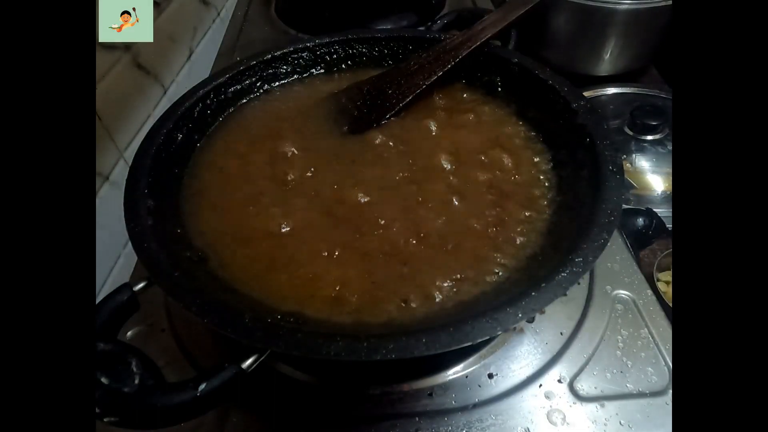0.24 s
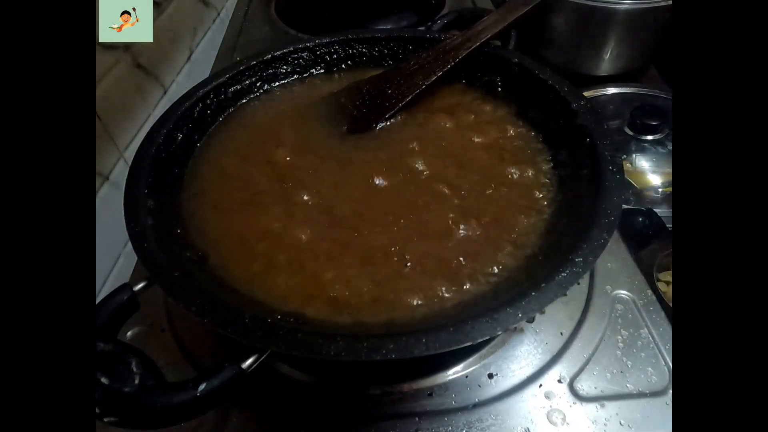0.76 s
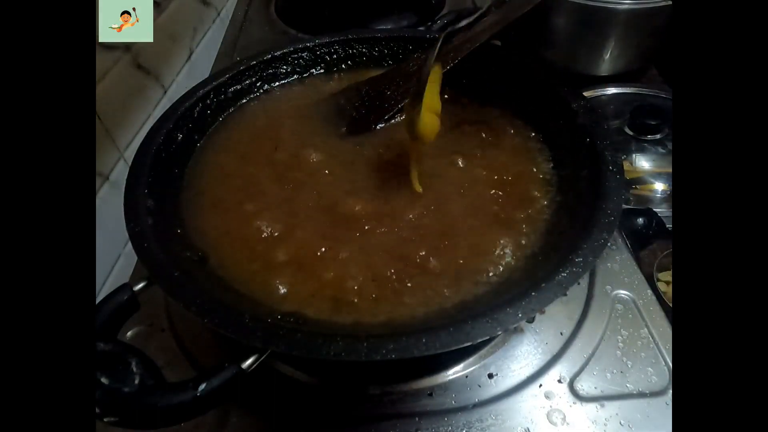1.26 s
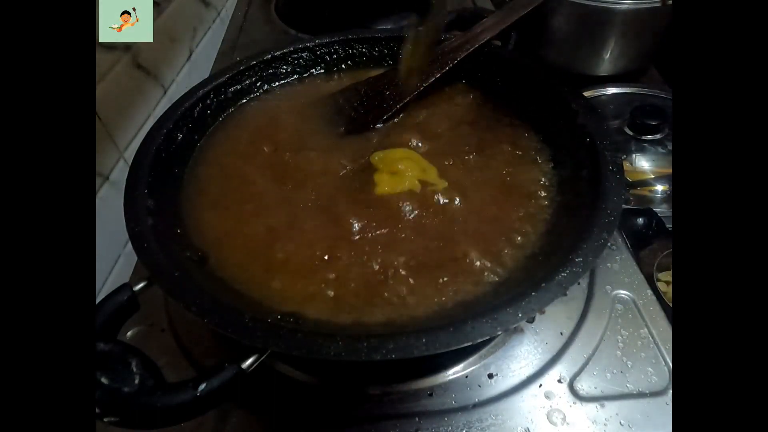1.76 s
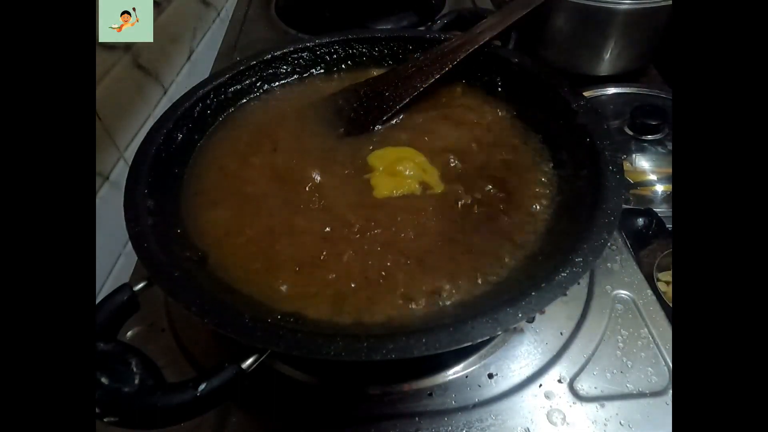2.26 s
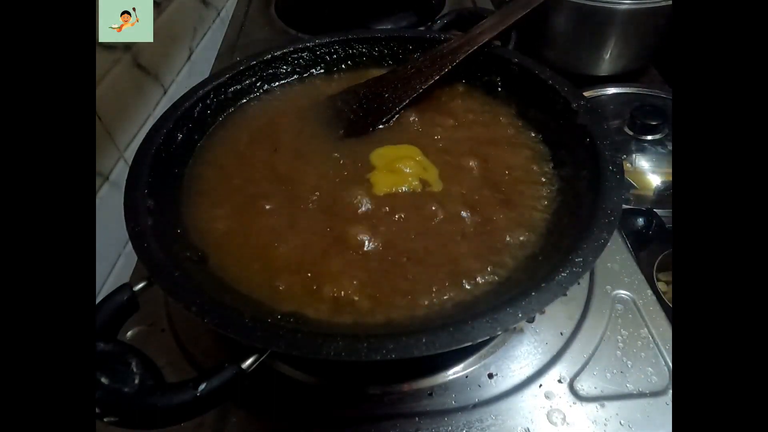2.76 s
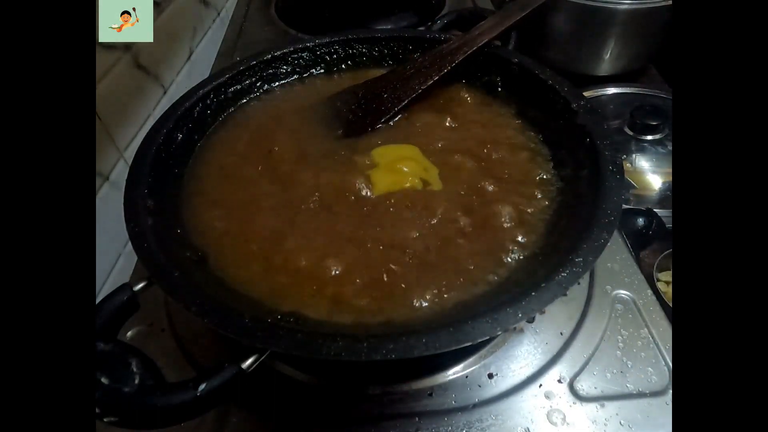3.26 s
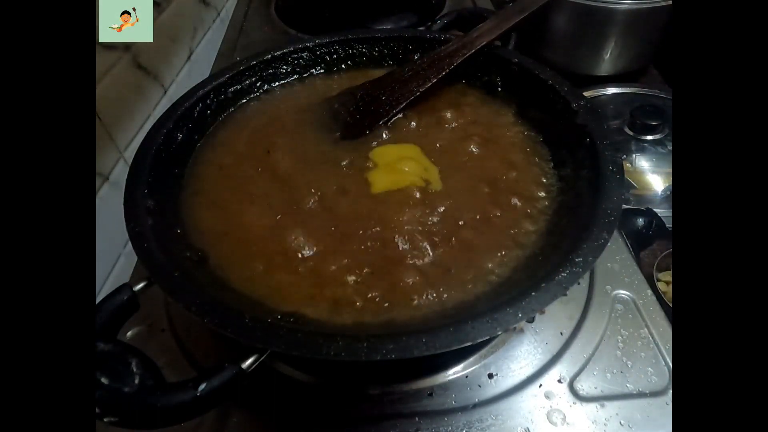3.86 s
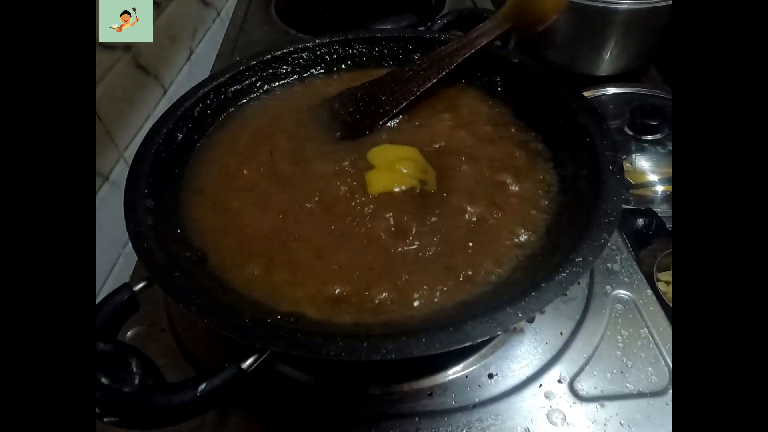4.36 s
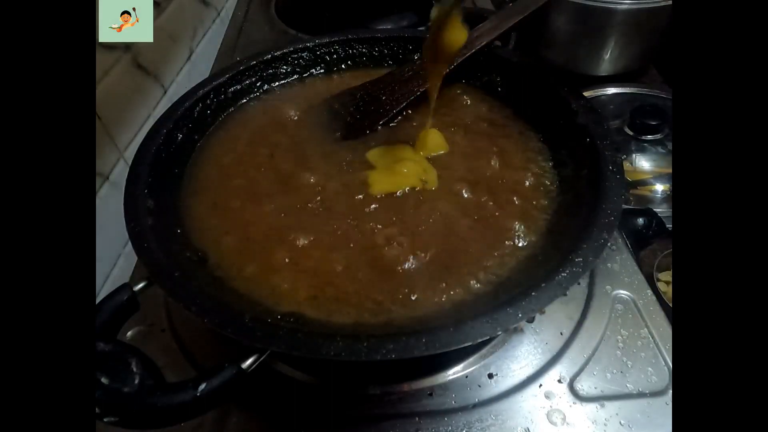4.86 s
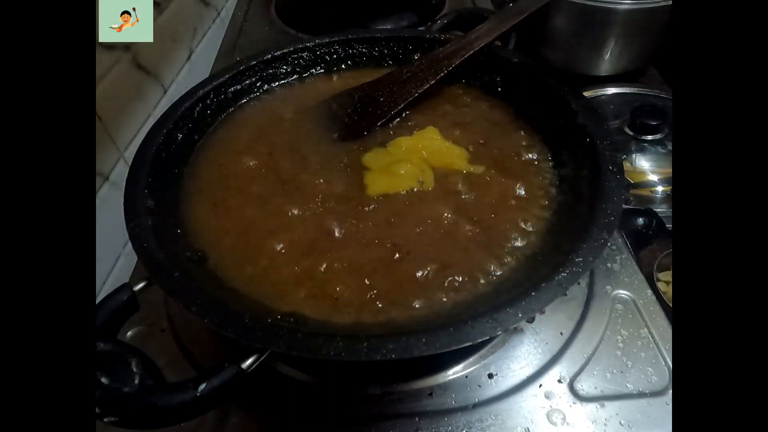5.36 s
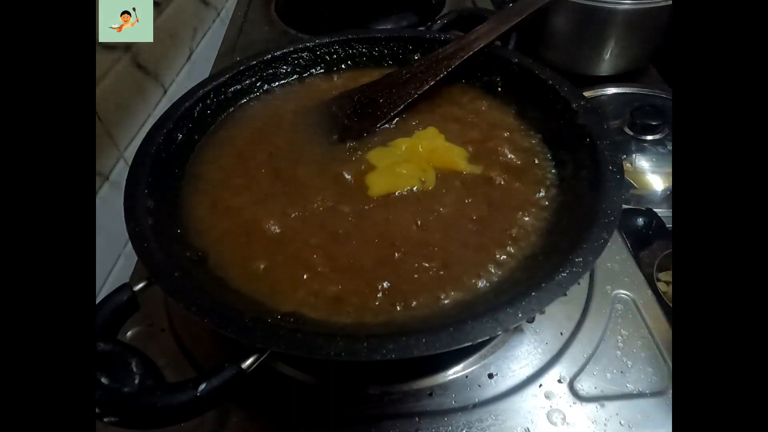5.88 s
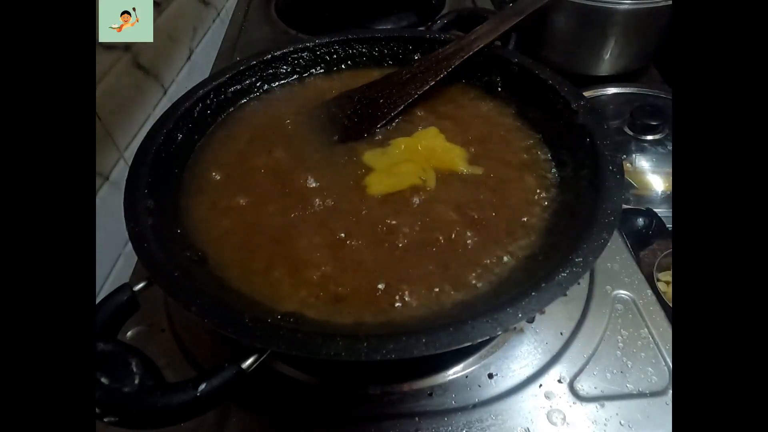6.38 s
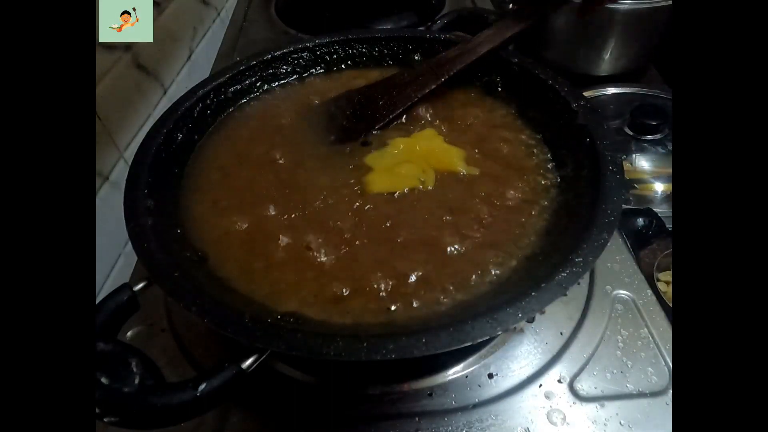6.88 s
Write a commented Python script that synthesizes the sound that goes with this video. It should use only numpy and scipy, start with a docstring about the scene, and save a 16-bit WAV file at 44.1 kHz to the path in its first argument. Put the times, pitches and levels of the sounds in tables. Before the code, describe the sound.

Close in a small hard kitchen, thick sweet paste boils for about seven seconds. Hundreds of short wet pops, mostly mid-high and each bending upward in pitch, overlap irregularly over quiet fizz and low simmer, with dry clicks of spitting fat and a few heavier plops jolting the pan. Glass bangles give tiny bright clinks around 0.4, 1.3, 1.9, 2.2 and 2.5 seconds. Soft rustling swells near 3.3, where a spoon faintly touches a jar; a clearer rim scrape comes at 3.8. Especially sharp pops stand out at 2.9, 3.7 and 4.1. Faint deep rumble comes and goes. At 6.2 a spatula knocks the pan hard and dully, just after a bangle clink; at 6.6 it knocks and scrapes grittily. A low thud rings the counter at 6.76, a bangle clinks at 6.85, and a lighter knock and scrape follow at 6.9 as bubbling continues.

```python
"""A thick sweet paste boils in a pan: steam bubbles burst as short rising cavity tones over a noisy low simmer,
with spits of fat as noise clicks and jolts of the pan. Two glass bangles clink now and then as ringing modes;
midway a cook spoons fat from a jar, stick-slip noise through its resonances. At the end a spatula knocks and
scrapes the pan the same way, and something set down rings the counter. Small hard kitchen, near stereo microphone."""
import sys
import numpy as np
from scipy import signal
from scipy.fft import rfft, irfft, next_fast_len
from scipy.io import wavfile
from scipy.ndimage import uniform_filter1d, map_coordinates

SR = 44100
rng = np.random.default_rng(int(sys.argv[2]) if len(sys.argv) > 2 else 0)


def volts_from_db(level):
    """Convert decibel levels to linear amplitude ratios."""
    exponent = np.asarray(level, float) / 20
    return 10 ** exponent


def transcribe(u):
    """Save the signal u as a 16-bit wav file named by the first command-line argument.

    u: samples, shape (n,) or (channels, n), limited to [-1, 1]; the rate is SR.
    q: integer samples, one column per channel.
    """
    v = np.clip(np.atleast_2d(u).T, -1, 1)
    q = np.round(v * 32767).astype(np.int16)
    wavfile.write(sys.argv[1], SR, q)


N = 314433  # samples

# Levels in the tables are relative; each source may add a gain of its own.


def bursts(start_s, level_db, pitch_hz, cycles):
    """Cavity resonance: a burst bubble rings a few cycles as it shrinks, so its pitch climbs and levels off."""
    t = np.arange(400) / SR
    turns = t * pitch_hz[:, None]
    luck = np.clip(rng.standard_normal((len(start_s), 2)), -2, 2)
    # thick paste damps big bubbles sooner
    life = cycles * np.exp(.3 * luck[:, :1]) * (pitch_hz[:, None] / 3000) ** .75
    # the pitch starts at 0.7 of pitch_hz and ends higher by climb times pitch_hz
    climb = .7 * np.exp(.2 * luck[:, 1:])
    phase = (.7 + climb) * turns - climb * 4 * (1 - np.exp(-turns / 4))
    onset = 1 - np.exp(-(t / .00026) ** 2)
    fade = np.clip(np.arange(400, 0, -1) / 100, 0, 1)
    ring = np.sin(2 * np.pi * phase) * np.exp(-turns / life) * onset * fade
    return scattered(start_s, volts_from_db(level_db + 4.5)[:, None] * ring, pan_db=1.5)


# droplets of fat spitting: start_s, level_db
SPITS = [(0.024, -42), (0.5541, -41.5), (0.5835, -44.5), (1.1171, -52), (0.851, -40), (1.369, -36.5),
         (1.5615, -46), (1.6382, -40), (1.8836, -47), (1.9053, -38.5), (2.2666, -39), (2.4184, -36),
         (2.8786, -36.5), (3.3903, -38), (3.4727, -41), (3.5925, -35.5), (4.2744, -40), (4.459, -50),
         (4.7102, -50), (4.8364, -44), (4.9696, -39), (5.1559, -44), (5.1925, -37.5)]


def spits(tiny_s):
    """Impulsive radiation: each droplet gives a click of noise dying within milliseconds."""
    tiny_db = -53 - 18 * np.sqrt(rng.uniform(size=len(tiny_s)))
    start_s, level_db = np.transpose(np.r_[SPITS, np.c_[tiny_s, tiny_db]])
    noise = uniform_filter1d(rng.standard_normal((len(start_s), 120)), size=3)
    click = noise * np.exp(-np.arange(120) / SR / .0005)
    return scattered(start_s, volts_from_db(level_db + 18)[:, None] * click, pan_db=-0.5)


# the loudest bursting bubbles: start_s, level_db, pitch_hz (nominal, as the pitch climbs)
POPS = [(0.011, -24, 1510), (0.0727, -27, 675), (0.103, -31.5, 3020), (0.392, -25.5, 2060),
        (0.4001, -22.5, 4060), (0.428, -25, 3900), (0.5837, -18, 5200), (0.615, -29, 2440),
        (0.6505, -24.5, 3400), (0.7123, -23, 5240), (0.743, -27, 2580), (0.867, -21, 2340),
        (0.8867, -27, 4160), (0.9137, -29, 2620), (0.9335, -28, 3250), (0.9842, -35, 2640),
        (1.0912, -29.5, 1510), (1.1086, -26.5, 2210), (1.1167, -31.5, 494), (1.1669, -28, 2860),
        (1.2385, -25, 2550), (1.3928, -31, 3400), (1.4618, -31, 850), (1.6187, -26.5, 1680),
        (1.6374, -26, 910), (1.733, -28, 3770), (1.8725, -25, 2500), (1.8843, -19.5, 2050),
        (1.9053, -24, 1450), (2.188, -30.5, 1040), (2.2946, -31.5, 694), (2.3293, -31, 1000),
        (2.2214, -19, 4080), (2.2292, -21.5, 2520), (2.3626, -25.5, 2800), (2.4182, -21, 1186),
        (2.43, -35, 3840), (2.5922, -24.5, 3825), (2.6123, -30, 3700), (2.664, -28, 3180),
        (2.681, -22, 3240), (2.736, -29.5, 1420), (2.8697, -25, 2280), (2.879, -14, 4630),
        (2.888, -28, 2100), (2.946, -21.5, 2570), (2.994, -25, 3430), (3.054, -28, 4800),
        (3.1076, -25, 4070), (3.1484, -28, 2500), (3.2447, -25, 3770), (3.266, -25.5, 2640),
        (3.5082, -25, 3050), (3.6992, -13.5, 2730), (3.717, -25, 4230), (3.893, -27, 3450),
        (3.9769, -25, 2730), (3.9826, -25.5, 2250), (4.091, -15, 2120), (4.2143, -21, 3570),
        (4.2657, -20.5, 5300), (4.3093, -29, 1980), (4.4436, -17, 2430), (4.5035, -23.5, 3140),
        (4.5454, -29, 3540), (4.596, -24.5, 2540), (4.729, -30.5, 2550), (4.8365, -23.5, 890),
        (4.8358, -17.5, 2590), (4.845, -31, 3030), (4.8918, -34, 1390), (5.0154, -25.5, 4170),
        (5.042, -23.5, 2700), (5.1313, -25, 2670), (5.1555, -25, 3640), (5.191, -33, 2800),
        (5.2532, -24.5, 2400), (5.3076, -28, 2290), (5.3233, -24.5, 4400), (5.3646, -31, 2350),
        (5.4274, -24, 3720), (5.4527, -32, 1600), (5.523, -27.5, 2470), (5.6754, -35, 3400),
        (5.8173, -27, 3370), (5.922, -21.5, 1510), (5.948, -26, 3670), (5.9663, -22, 5340),
        (6.0031, -28, 4400), (6.073, -28.5, 4300), (6.0895, -26.5, 2560), (6.1333, -23, 3530),
        (6.3697, -30.5, 3830), (6.405, -26, 2730), (6.4328, -23, 3680), (6.4638, -25.5, 2380),
        (6.8922, -24.5, 4560), (6.952, -23, 3600), (7.001, -25.5, 2570), (7.08, -28, 3030)]


def bubbles(count=2400, middling=520, clumped=300):
    """Random point process: big pops at set times, middling and small ones by chance, some in clumps, and spits."""
    luck = rng.uniform(size=(count, 2))
    pitch_hz = np.clip(3100 * np.exp(0.49 * rng.standard_normal(count)), 300, 8500)
    # the smallest, highest bubbles are the faintest
    level_db = -30.5 - 14 * np.sqrt(luck[:, 1]) - 9 * np.clip(np.log2(pitch_hz / 4000), 0, 2)
    level_db[:middling] = -27 - 10 * luck[:middling, 1]
    scatter = .36 * np.clip(rng.standard_normal(middling), -4, 1.5)
    pitch_hz[:middling] = 3040 * np.exp(scatter)
    random_s = luck[:, 0] * N / SR
    start_s = random_s.copy()
    # a big pop sets off neighbours, which burst soon after it
    leader_s = np.array(POPS)[(luck[:clumped, 0] * len(POPS)).astype(int), 0]
    delay_s = .006 + .05 * rng.exponential(size=clumped)
    start_s[:clumped] = np.minimum(leader_s + delay_s, N / SR)
    pops = bursts(start_s, level_db, pitch_hz, cycles=2.0) + bursts(*np.transpose(POPS), cycles=2.4)
    return pops + spits(tiny_s=random_s[::4])


# spatula on the pan: start_s, level_db, decay_s (contact, 60 dB)
KNOCKS = [(6.2244, -9.5, 0.017), (6.226, -27, 0.25), (6.267, -34, 0.077), (6.6078, -17, 0.018),
          (6.927, -29, 0.017)]
# resonances of the pan: frequency_hz, width_hz, level_db
PAN = [(630, 40, -2), (1000, 40, 3), (1860, 60, -3), (2765, 32, 4), (3060, 60, -10), (3850, 50, 1),
       (4330, 50, -3), (4500, 60, 1), (5190, 50, 0), (5450, 50, -2), (5770, 70, -8), (7400, 80, -9),
       (7950, 120, -8)]


def knocks():
    """Impact excitation: brief contact noise drives the pan; wood is a soft hammer and dulls the treble."""
    force = decays(KNOCKS)
    blows = rubbed(force, PAN, broad=(2800, 4500, -8), gritty_db=0)
    return filtered(blows, lambda hz: 1 / (1 + 1j * hz / 3500))


# spatula along the pan: peak_s, level_db, rise_s (20 dB), fall_s (20 dB)
SLIDES = [(6.608, -21, .0006, .11), (6.662, -21, .04, .05), (6.72, -34.5, .04, .24),
          (6.928, -31.5, .0006, .12), (6.975, -33.5, .05, .06)]


def slides():
    """Stick-slip friction: grit drives the pan, and a light slide wakes the upper modes."""
    slide = rubbed(swells(SLIDES), PAN, broad=(4600, 3200, -6), gritty_db=3)
    return filtered(slide, lambda hz: 1j * hz / (2500 + 1j * hz) / (1 + 1j * hz / 9000) ** 2)


# spoon on the jar wall: peak_s, level_db, rise_s (20 dB), fall_s (20 dB)
WALL_STROKES = [(3.175, -45, .004, 0.073), (3.33, -52, 0.46, .12), (3.8, -40, .03, 0.017)]
# spoon over the jar rim: peak_s, level_db, rise_s (20 dB), fall_s (20 dB)
RIM_STROKES = [(3.3, -53.5, .3, 1), (3.775, -32, 0.033, 0.078)]
# resonances of the jar wall: frequency_hz, width_hz, level_db
JAR_WALL = [(1017, 20, 1), (1230, 25, -25), (1510, 31, -23)]
# resonances of the jar rim: frequency_hz, width_hz, level_db
JAR_RIM = [(2250, 96, 2.5), (2784, 64, 6), (4250, 87, -1.5), (5670, 95, -1.5)]


def spoon_in_jar():
    """Stick-slip friction: the strokes of the spoon excite the jar's wall and rim."""
    wall = rubbed(swells(WALL_STROKES), JAR_WALL, broad=(3000, 4000, -30), gritty_db=6.0)
    rim = rubbed(swells(RIM_STROKES), JAR_RIM, broad=(4200, 5000, -20), gritty_db=0.0)
    return wall + rim


# clinks of each bangle: start_s, level_db, left_minus_right_db
THIN_CLINKS = [(0.3724, -35.5, -1), (1.326, -33, -3), (1.401, -49, -2), (2.1809, -40, -1.0),
               (2.504, -31, -1), (2.7761, -52, -2), (3.1552, -39, -3), (5.0126, -50.5, -5),
               (6.1434, -32, 1)]
WIDE_CLINKS = [(1.2869, -38.5, 3), (1.7279, -48.5, 4), (1.8617, -41.5, 1), (2.0687, -37.5, 1),
               (4.2418, -47, 3), (6.8473, -33, 5)]
# modes of each bangle: frequency_hz, level_db, decay_s (60 dB)
THIN_BANGLE = [(4870, -12.5, 0.14), (8280, -10, 0.16), (9200, -3, 0.13), (13160, -10, .1),
               (14750, -8, 0.15)]
WIDE_BANGLE = [(4409, -4, 0.13), (9620, 1.5, 0.13), (8400, -8, 0.045), (13440, -2, 0.069),
               (15400, -1, 0.044)]


def bangles():
    """Modal vibration: glass on glass rings the high modes of a thin and a wide bangle."""
    thin = struck(THIN_CLINKS, THIN_BANGLE, gain_db=-0.5, crack_db=-8, crack_s=0.047, attack_s=0.00024)
    wide = struck(WIDE_CLINKS, WIDE_BANGLE, gain_db=-2, crack_db=1, crack_s=.012, attack_s=0.00023)
    return thin + wide


# something set down on the counter: start_s, level_db
THUDS = [(6.7605, -16.5), (6.783, -27.5)]
# modes of the counter: frequency_hz, level_db, decay_s (60 dB)
COUNTER = [(84, -1.5, 0.32), (175, -4, 0.18), (214, -4.5, 0.15), (284, -15.5, .2), (326.5, -4.5, 0.12),
           (430, -18, 0.096), (532, -3, .07), (636, -6, 0.11), (680, -5, .13), (885, -7.5, 0.045)]
# resonances of the pan on its stand: frequency_hz, width_hz, level_db
PAN_ON_STAND = [(175.5, 22, 5.5), (238, 15, -12), (249.6, 5.4, -6), (328.2, 32, 1), (596, 16, -8.5),
                (634, 72, -11.5), (1033, 19, -6.5)]


def set_down():
    """Structure-borne sound: a weight set down rings the counter's modes and shakes the pan on its stand."""
    ring = struck(THUDS, COUNTER, gain_db=-0.5, crack_db=-30, crack_s=.03, attack_s=0.0014)
    shake = decays([(start_s, level_db - 15.5, 0.14) for start_s, level_db in THUDS])
    return ring + rubbed(shake, PAN_ON_STAND, broad=(550, 600, -6), gritty_db=-2.0)


# heavy bubbles jolting the pan: start_s, level_db, decay_s (60 dB)
PLOPS = [(0.022, -37, 0.11), (0.081, -38, 0.18), (0.884, -42, .12), (1.117, -36.5, 0.23),
         (2.33, -43, 0.099), (3.175, -47, 0.092)]


def plops():
    """Forced vibration: heavy bubbles jolt the upper resonances of the pan on its stand."""
    return rubbed(decays(PLOPS), PAN_ON_STAND[3:], broad=(420, 300, -3), gritty_db=-0.5)


# course of the simmer: time_s, fizz_db, boil_db
SIMMER = [(0.0, -44.5, -49.5), (0.87, -45.5, -51.5), (2.2, -45.5, -51), (3.37, -43.5, -52),
          (4.81, -50, -53), (6.93, -41.5, -49.5), (7.13, -46, -52)]
# spectrum of the surface fizz: frequency_hz, level_db (per Hz)
FIZZ = [(240, -14), (400, 9), (570, 12), (801, -37), (1030, -14), (1290, -7.5), (3690, 2), (7630, -13),
        (12300, -95.5), (16000, -72)]


def simmer():
    """Filtered noise: the surface fizzes with a flickering level, and boiling excites the pan bottom."""
    fizz_db, boil_db = curves(SIMMER)
    flicker_db = 1.5 * wobble(40) + 3.5 * wobble(500)
    fizz = volts_from_db(fizz_db - 12.0 + flicker_db) * rush(lambda hz: volts_from_db(along(FIZZ, hz)))
    boil = volts_from_db(boil_db + 0.5 + 2.3 * wobble(38)) * rush(resonances(PAN_ON_STAND))
    return fizz + boil


# rustling near the pan: peak_s, level_db, rise_s (20 dB), fall_s (20 dB)
RUSTLES = [(.04, -40.5, .5, 0.21), (.28, -45, 0.028, 0.28), (.36, -46, 0.2, 0.033),
           (1.095, -50, 0.0045, 0.069), (1.3, -55, 0.1, .3), (1.88, -43.5, 0.042, 0.072),
           (2.28, -52.5, .2, 0.092), (3.26, -37, 0.079, 0.17), (3.48, -43, 0.062, 0.049),
           (3.79, -45, 0.31, 0.089), (4.0, -39, 0.022, 0.022), (4.26, -53.5, 0.19, 0.11),
           (5.97, -49, 0.06, .25), (6.8, -41.5, .15, 0.067), (6.98, -41.5, 0.12, 0.058)]
# spectrum of the rustle: frequency_hz, level_db (per Hz)
RUSTLE = [(410, -41), (700, -11.5), (1230, -6.5), (1350, -10.5), (3940, -2), (6070, -8.5), (7110, -10.5),
          (9110, -19.5), (12300, -20.5), (16000, -36)]


def rustle():
    """Amplitude-modulated noise: the cook rustles in grainy swells above a faint floor."""
    grain_db = 1.5 * wobble(80) + 2.5 * wobble(600)
    loudness = volts_from_db(-58) + swells(RUSTLES)
    return loudness * volts_from_db(grain_db) * rush(lambda hz: volts_from_db(along(RUSTLE, hz)))


# hum of the counter: peak_s, level_db, rise_s (20 dB), fall_s (20 dB)
HUMS = [(.3, -50, 0.75, 0.62), (1.18, -53, 0.19, .3), (2.0, -56, .25, .5), (2.42, -62, .3, .2),
        (3.35, -59, 0.82, 1.5), (4.68, -50, 0.17, 0.32), (5.4, -62, 1, 0.9), (7.1, -55.5, 1, 1.2)]


def counter_hum():
    """Narrow-band resonance: noise through a double resonance at 84 Hz hums in the counter."""
    return swells(HUMS) * volts_from_db(2.0 * wobble(8)) * rush(lambda hz: resonances([(84, 22, 0)])(hz) ** 2)


# deep rumble: peak_s, level_db, rise_s (20 dB), fall_s (20 dB)
RUMBLES = [(.7, -55.5, 2, 1), (1.6, -68, 1, 1), (2.8, -67, 2.3, 3.4), (4.1, -61, 1.6, 1),
           (4.55, -53, 0.41, .08), (5.08, -53.5, .5, 0.27), (5.6, -57, .1, .8), (6.04, -52, .15, 0.43),
           (6.45, -53, .5, .5)]


def rumble():
    """Narrow-band resonance: a deep rumble through the counter, at 31 Hz, comes and goes."""
    return swells(RUMBLES) * volts_from_db(1.6 * wobble(5)) * rush(lambda hz: resonances([(31, 14, 0)])(hz) ** 2)


# reverberation of the room: frequency_hz, decay_s (60 dB)
KITCHEN = [(200, 0.53), (2000, 0.14), (10000, 0.067)]


def kitchen(x):
    """Reverberation: the pan wall answers within milliseconds; the room dies at its own speed per frequency."""
    hz, t, noise = signal.stft(rng.standard_normal((2, N)), SR, nperseg=256)
    fading = noise * volts_from_db(-60 * t / along(KITCHEN, hz)[:, None])
    tail = signal.istft(fading, SR, nperseg=256)[1][:, :N]
    tail = widened(tail, lambda hz: hz / (hz + 400))[:, :SR // 2]
    tail = volts_from_db(-10.5) * np.pad(tail / np.linalg.norm(tail[0]), ((0, 0), (200, 0)))  # 200 samples late
    for left_s, right_s, level_db in [(.0019, 0.0012, -17.5), (.0036, 0.003, -9.5), (.0062, .0068, -17)]:
        tail[[0, 1], [round(left_s * SR), round(right_s * SR)]] += volts_from_db(level_db)
    return signal.fftconvolve(x, tail, axes=1)[:, :N]


def struck(blows, modes, gain_db, crack_db, crack_s, attack_s):
    """Modal synthesis: every blow rings the modes at new strengths, along with a short crack of noise."""
    out, t = np.zeros((2, N + SR)), np.arange(SR // 2) / SR
    for start_s, blow_db, *balance_db in blows:
        ring = np.zeros(len(t))
        for hz, level_db, decay_s in modes:
            envelope = volts_from_db(level_db + rng.normal(0, 1.2) - 60 * t / decay_s)
            onset = 1 - np.exp(-t / (attack_s + (12 / hz) ** 2))  # low modes are slow to start
            ring += envelope * np.sin(2 * np.pi * hz * t) * onset
        noise = uniform_filter1d(rng.standard_normal(len(t)), size=3)
        crack = volts_from_db(crack_db - 60 * t / crack_s) * noise
        sides = volts_from_db(np.sum(balance_db) / 2 * np.array([[1], [-1]]))
        out[:, round(start_s * SR):][:, :len(t)] += volts_from_db(blow_db + gain_db) * sides * (ring + crack)
    return out[:, :N]


def rubbed(force, body, broad, gritty_db):
    """Source and filter: grit under a force, heard through the body and directly as one broad band."""
    response = lambda hz: resonances(body)(hz) + resonances([broad])(hz)
    grit = rng.standard_normal((2, N)) * volts_from_db(gritty_db * np.clip(wobble(400), -2, 2))
    loudness = np.std(filtered(grit, response))
    return widened(force * grit, response) / loudness


def resonances(peaks):
    """Linear resonance: the causal response of (Hz, width Hz, dB) peaks, with alternating signs."""
    def response(hz):
        total = 0
        for k, (centre, width, level_db) in enumerate(peaks):
            damping = 1j * hz * width
            total = total + (-1) ** k * volts_from_db(level_db) * damping / (centre * centre - hz * hz + damping)
        return total
    return response


def rush(response):
    """Spectral shaping: coloured stereo noise of rms 1."""
    return unit(widened(rng.standard_normal((2, N)), response))


# stereo width: frequency_hz, left-right likeness (correlation)
ALIKE = [(40, 0.96), (500, 0.9), (3000, 0.53), (12000, 1)]


def widened(pair, response):
    """Interchannel coherence: two noises become a coloured left and right, as alike as ALIKE says."""
    turn = lambda hz: np.arccos(np.clip(along(ALIKE, hz), -1, 1)) / 2
    mid, side = filtered(pair, lambda hz: response(hz) * [np.cos(turn(hz)), np.sin(turn(hz))])
    return np.array([mid + side, mid - side])


def scattered(start_s, grains, pan_db):
    """Superposition: short sounds summed at their times, each at its own place on the surface."""
    at = (np.round(start_s * SR).astype(int)[:, None] + np.arange(grains.shape[1])).ravel()
    place_db = -.6 + pan_db * rng.standard_normal((len(start_s), 1))
    sides = [(grains * volts_from_db(sign * place_db / 2)).ravel() for sign in (1, -1)]
    return np.array([np.bincount(at, side, N + SR)[:N] for side in sides])


def decays(rows):
    """Exponential decay: each (start s, dB, 60 dB decay s) row starts at once and dies straight in dB."""
    t = np.arange(N) / SR
    return sum((t >= s) * volts_from_db(db - 60 * np.abs(t - s) / decay_s) for s, db, decay_s in rows)


def swells(rows):
    """Exponential envelope: each row rises to its peak and falls away, straight in dB."""
    t = np.arange(N) / SR
    return sum(volts_from_db(db - 20 * np.where(t < s, (s - t) / rise_s, (t - s) / fall_s))
               for s, db, rise_s, fall_s in rows)


def curves(rows):
    """Linear interpolation: one value per sample for each column after the time; -120 outside."""
    s, *columns = np.transpose(rows)
    return [np.interp(np.arange(N) / SR, s, c, left=-120, right=-120) for c in columns]


def wobble(rate):
    """Random modulation: a smooth random curve with rate knots a second."""
    return map_coordinates(rng.standard_normal(int(N * rate / SR) + 4), [np.arange(N) * rate / SR])


def filtered(x, response):
    """Linear filtering: the spectrum of x times a complex response of frequency."""
    m = next_fast_len(N + SR // 2)
    return irfft(rfft(x, m) * response(np.fft.rfftfreq(m, 1 / SR)), m)[..., :N]


def along(points, hz):
    """Logarithmic interpolation: (Hz, value) points on a log frequency axis."""
    f, v = np.transpose(points)
    return np.interp(np.log(hz + 1), np.log(f + 1), v)


def unit(x):
    """Normalization: x scaled to rms 1."""
    return x / np.sqrt(np.mean(x ** 2) + 1e-20)


def scene():
    """Superposition: all sources, with the room on the near ones, and a small arrival-time difference."""
    near = bubbles() + knocks() + slides() + spoon_in_jar() + bangles()
    mix = near + kitchen(near) + set_down() + plops() + simmer() + rustle() + counter_hum() + rumble()
    # the pan is a little nearer the right port: left 8 microseconds later, right 8 earlier
    delay_s = .000008 * np.array([[1], [-1]])
    return filtered(mix, lambda hz: np.exp(-2j * np.pi * hz * delay_s))


def top_cut(x):
    """Nothing passes above the cut-off."""
    return signal.sosfilt(signal.butter(12, 16470, fs=SR, output="sos"), x)


# treble roll-off of the microphone: frequency_hz, level_db
MICROPHONE = [(20, 0), (9000, 0), (13000, -5), (15700, -10), (15900, -60)]


def record(dry):
    """Frequency response: the microphone rolls off the treble."""
    mix = filtered(dry, lambda hz: volts_from_db(along(MICROPHONE, hz)))
    return top_cut(mix)


dry = scene()
out = record(dry)
transcribe(out)
```